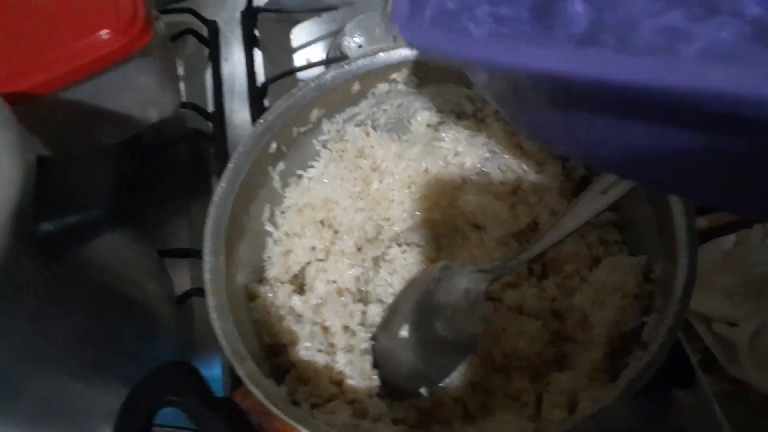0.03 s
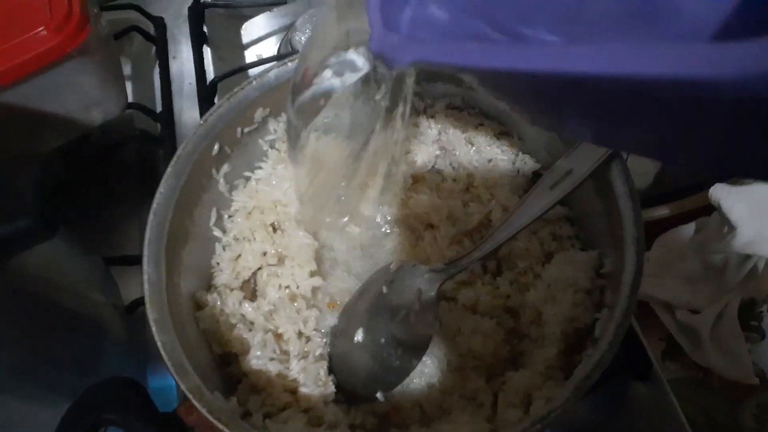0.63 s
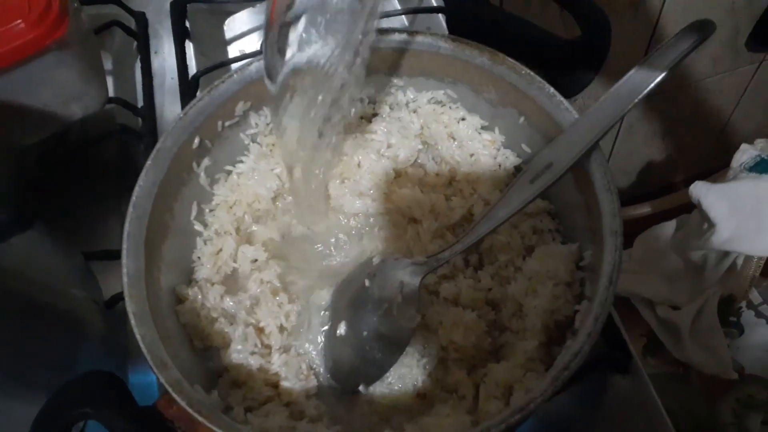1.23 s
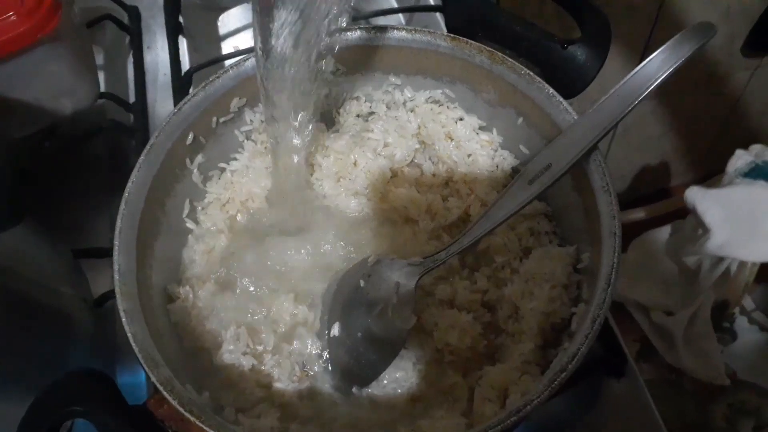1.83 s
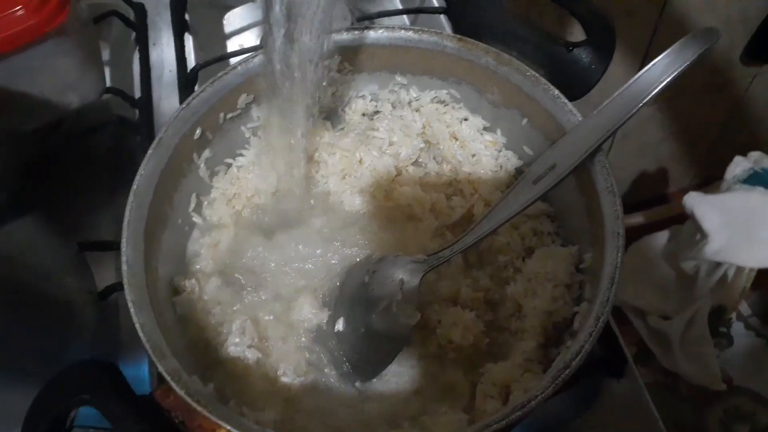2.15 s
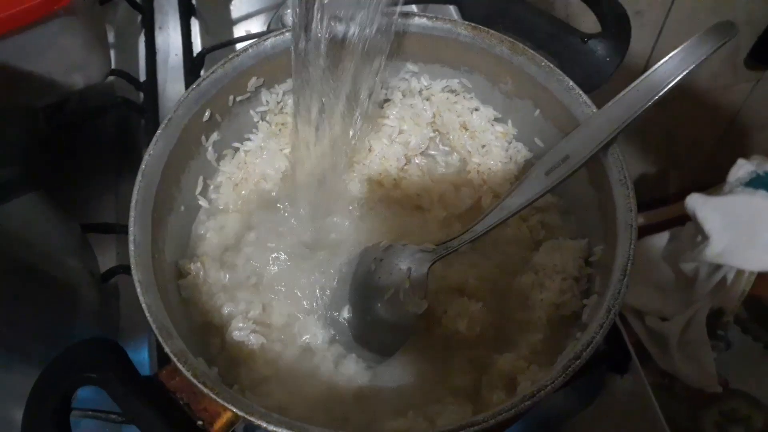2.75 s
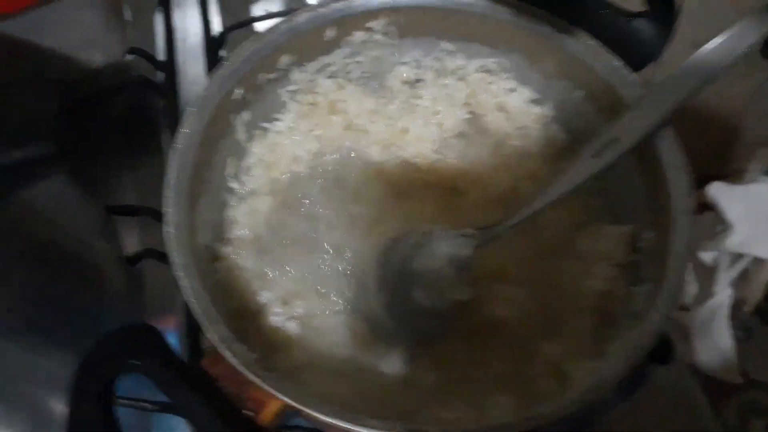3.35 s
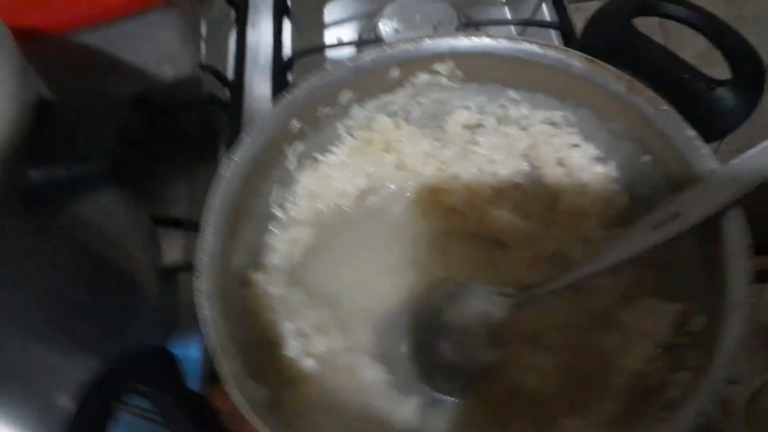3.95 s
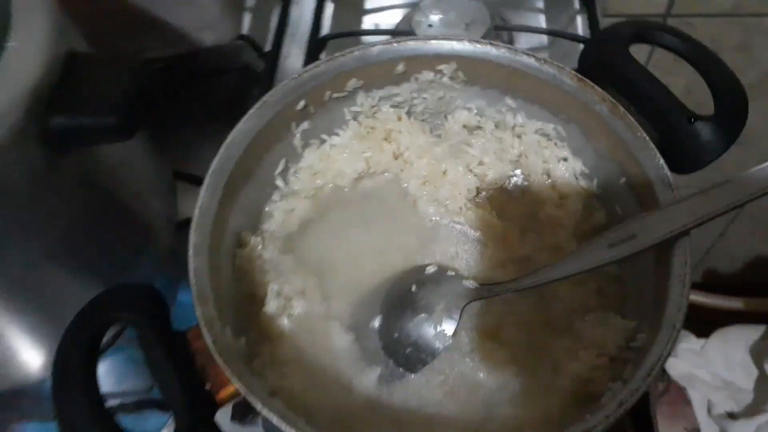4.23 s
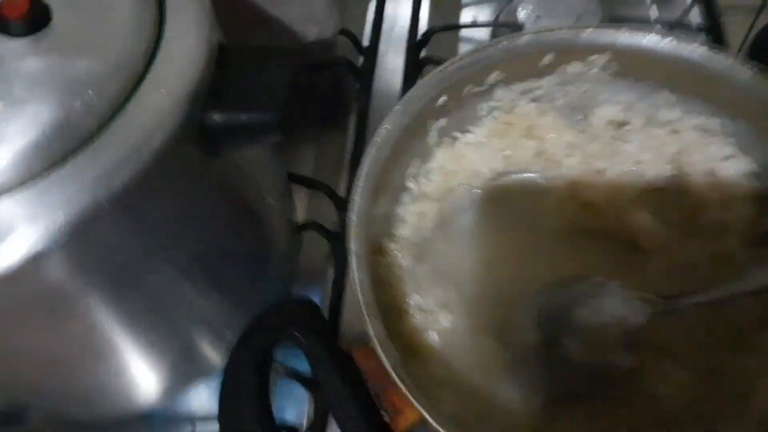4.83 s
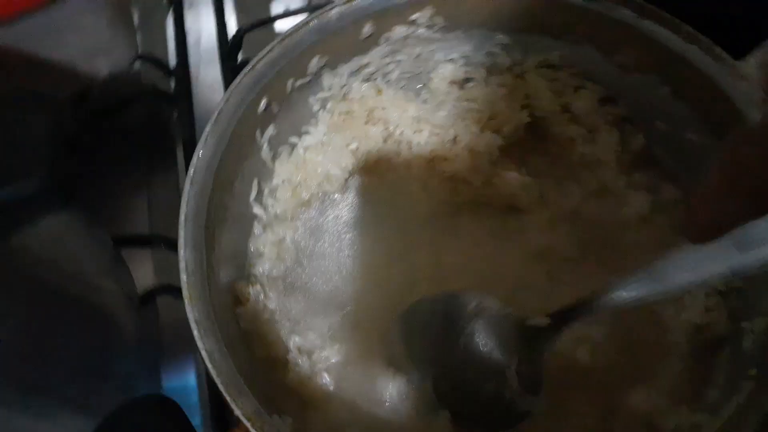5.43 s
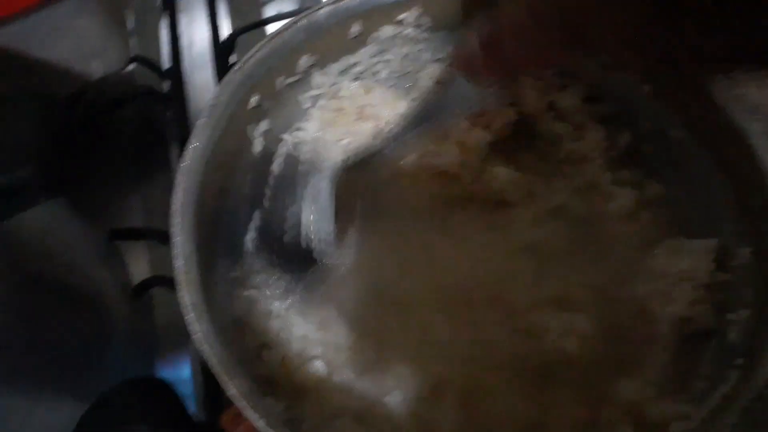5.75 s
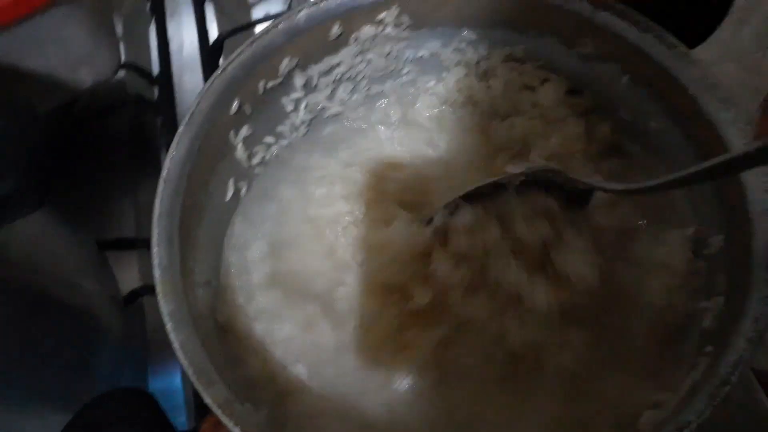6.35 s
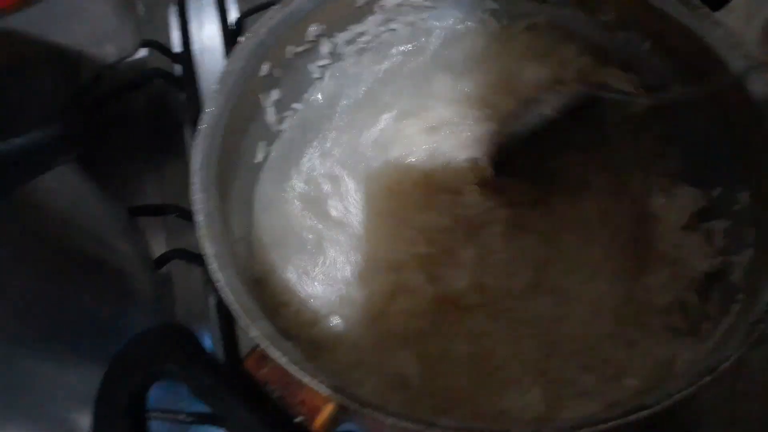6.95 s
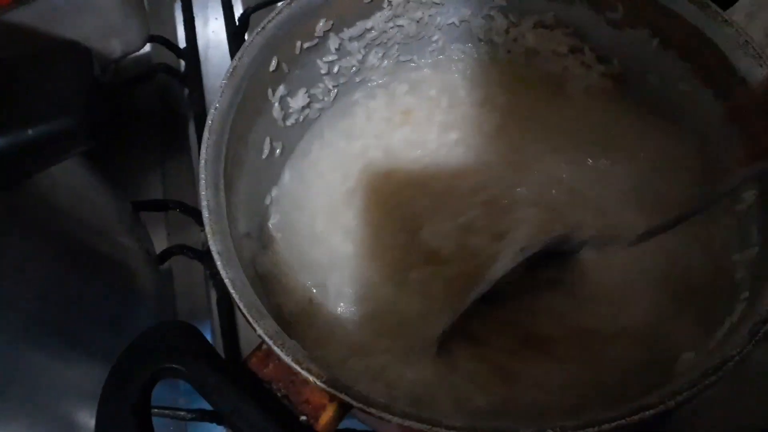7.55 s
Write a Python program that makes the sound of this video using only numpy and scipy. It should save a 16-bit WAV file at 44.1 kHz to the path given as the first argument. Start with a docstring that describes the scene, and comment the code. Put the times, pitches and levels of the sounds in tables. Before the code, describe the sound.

A pressure cooker blows off steam throughout, a bright, breathy hiss that throbs rapidly. Close to the microphone, water is poured onto hot rice for about three seconds, splashing and bubbling as a sizzle flares and fades. A plastic jug is set down with two hollow thumps. Then a metal spoon stirs the wet rice, scraping and knocking the pot, with one sharp clink. The place is a small home kitchen.

```python
"""Pressure cooker and sizzling rice.

A pressure cooker blows off steam on a gas stove, its valve weight throbbing in the jet.
Beside it water is poured from a plastic jug onto hot, sizzling rice. The jug is set down with two
thumps, then a metal spoon stirs the pot. One sharp clink makes a limiter duck."""
import sys
import numpy as np
from scipy import signal
from scipy.fft import rfft, irfft
from scipy.io import wavfile
from scipy.ndimage import uniform_filter1d, minimum_filter1d

SR = 44100
rng = np.random.default_rng(int(sys.argv[2]) if len(sys.argv) > 2 else 0)


def waveform_to_disk(signal):
    """Save audio, clipped to [-1, 1], as 16-bit WAV at the path in sys.argv[1]."""
    frames = np.transpose(np.atleast_2d(signal))
    scaled = np.clip(frames, -1, 1) * 32767
    samples = np.round(scaled).astype(np.int16)
    wavfile.write(sys.argv[1], SR, samples)


N = 339510
TIME = np.arange(N) / SR
FREQS = np.maximum(np.arange(N // 2 + 1) * SR / N, 1)


def from_db(db):
    """Decibels to gain."""
    return 10 ** (np.asarray(db) / 20)


def unit_rms(x):
    """Scale to unit power."""
    return x / np.sqrt(np.mean(x ** 2) + 1e-20)


def curves(rows):
    """Each column after the first (time), interpolated at every sample."""
    times_s, *columns = np.transpose(rows)
    return [np.interp(TIME, times_s, column) for column in columns]


def swell(start_s, length_s, attack_s, release_s):
    """Linear rise, hold, exponential release."""
    rise = np.clip((TIME - start_s) / attack_s, 0, 1)
    return rise * np.exp(-np.clip((TIME - start_s - length_s) / release_s, 0, 20))


def drift(rate_hz):
    """Slow random wander, RMS 1."""
    step, warmup = 40, 2000
    r = np.exp(-2 * np.pi * rate_hz * step / SR)
    noise = rng.standard_normal(N // step + warmup + 2)
    slow = signal.lfilter([1], [1, -2 * r, r * r], noise)[warmup:]
    return np.interp(np.arange(N) / step, np.arange(len(slow)), unit_rms(slow))


def coloured(x, spectrum):
    """Filter by (frequency [Hz], gain [dB]) points."""
    hz, db = np.transpose(spectrum)
    gain = from_db(np.interp(np.log(FREQS), np.log(hz), db))
    return irfft(rfft(x) * gain, N)


def butter(x, order, hz, kind):
    """Butterworth filter."""
    return signal.sosfilt(signal.butter(order, hz, kind, fs=SR, output="sos"), x)


def delayed(x, delay_s):
    """Circular fractional delay."""
    return irfft(rfft(x) * np.exp(-2j * np.pi * FREQS * delay_s), N)


def ring(clicks, hz, t60_s):
    """One mode: a unit click starts a decaying sine of height 1."""
    r = np.exp(-np.log(1000) / (t60_s * SR))
    w = 2 * np.pi * hz / SR
    return signal.lfilter([0, np.sin(w)], [1, -2 * r * np.cos(w), r * r], clicks + 1e-18)


def struck(clicks, modes):
    """All modes of a body, signs alternating."""
    return sum((-1) ** k * from_db(db) * ring(clicks, hz, t60_s)
               for k, (hz, db, t60_s) in enumerate(modes))


def blows(rows):
    """One click per (time [s], level [dB]) row."""
    out = np.zeros(N)
    for at_s, db in rows:
        out[round(at_s * SR)] += from_db(db)
    return out


def grains(per_s, spread_db):
    """Random clicks of uneven size and sign."""
    sizes = from_db(spread_db * np.minimum(rng.exponential(1, N), 5))
    signs = rng.choice([-1, 1], N)
    return sizes * signs * (rng.random(N) < per_s / SR)


def noise_band(hz, width_hz):
    """Two independent channels of resonant noise; the centre may move."""
    r = np.exp(-np.pi * width_hz / SR)
    slow = signal.lfilter([1], [1, -2 * r, r * r], rng.standard_normal((2, 2, N)))
    phase = 2 * np.pi * np.cumsum(hz * np.ones(N)) / SR
    return unit_rms(slow[0] * np.cos(phase) + slow[1] * np.sin(phase))


# burner noise: (frequency [Hz], gain [dB])
FLAME_SPECTRUM = [(25, -34), (45, -11), (60, 3), (78, 3), (100, -12), (143, 7.5), (175, -6), (210, -10),
                  (260, 2.5), (450, 5.5), (900, -3), (3000, -44)]


def flame(level_db=-50.0):
    """The gas burners' low, uneven murmur."""
    level = from_db(level_db + 0.64 * drift(6.8))
    return level * unit_rms(coloured(rng.standard_normal(N), FLAME_SPECTRUM))


# frying: (frequency [Hz], gain [dB])
SIZZLE_SPECTRUM = [(30, -60), (500, -26), (2000, -5.5), (5000, -4), (7400, -5.5), (10000, 2), (12200, 4.5),
                   (14000, 3), (16000, -1)]


def sizzle(fry_db=-22.5, flare_db=-10.5, peak_s=1.22, rise_db_per_s=10, quench_db_per_s=3,
           revived_db=-18.5, revive_at_s=7.1, revive_s=0.16, sputter_db=1.5):
    """Tiny bursts on hot rice flare as water spreads, are quenched, then revive with stirring."""
    since_s = TIME - peak_s
    flare = from_db(flare_db + np.minimum(rise_db_per_s * since_s, -quench_db_per_s * since_s))
    revived = from_db(revived_db) * np.clip((TIME - revive_at_s) / revive_s, 0, 1)
    level = np.sqrt(from_db(fry_db) ** 2 + flare ** 2 + revived ** 2)
    bursts = np.array([grains(per_s=13000, spread_db=2.0) for side in range(2)])
    return level * from_db(sputter_db * drift(19)) * unit_rms(coloured(bursts, SIZZLE_SPECTRUM))


# pockets between rice grains: (frequency [Hz], level [dB], t60 [s])
POCKET_MODES = [(1930, -4, 0.011), (2030, 7, 0.021), (2210, -7, 0.01)]


def slap(level_db=-35):
    """Before a puddle forms, drops burst brightly among the grains."""
    level = from_db(level_db) * swell(start_s=0.26, length_s=0.46, attack_s=.07, release_s=0.15)
    return level * unit_rms(struck(grains(per_s=360, spread_db=3.0), POCKET_MODES))


POUR_START_S = 0.22


def stream():
    """Flow from the jug, 0 to 1."""
    return swell(POUR_START_S, length_s=3.014, attack_s=0.053, release_s=0.074)


# pot under the stream: (frequency [Hz], gain [dB])
DRUMMING_SPECTRUM = [(40, -20), (70, -29), (110, 6.5), (160, -0.5), (240, 2.5), (400, 12), (900, -20)]


def drumming(level_db=-40.5, cushion_db_per_s=3.0):
    """The stream patters dully on rice and pot floor, softer as the water rises."""
    level = from_db(level_db - cushion_db_per_s * (TIME - POUR_START_S))
    drops = grains(per_s=400, spread_db=1.5)
    return level * stream() * unit_rms(coloured(drops, DRUMMING_SPECTRUM))


# pot's colouring of the bubbles: (frequency [Hz], gain [dB])
BUBBLE_SPECTRUM = [(60, -19), (200, -11.5), (270, -2.5), (400, -0.5), (520, 2.5), (660, 2.5), (850, 5),
                   (1300, 1)]


def bubbles(gush_db=-34.5, fade_db_per_s=10.5, puddle_db=-36.5, puddle_at_s=1.22, fill_s=0.69,
            t60_cycles=9.9):
    """The stream beats in small bubbles: a first gush dies down, then a puddle forms."""
    gush = from_db(gush_db - fade_db_per_s * (TIME - POUR_START_S))
    puddle = from_db(puddle_db) * np.clip((TIME - puddle_at_s) / fill_s, 0, 1)
    pitches_hz = np.geomspace(350, 1250, 20)
    births = grains(per_s=500, spread_db=3.0)
    pitch_index = rng.integers(0, len(pitches_hz), N)
    ringing = sum(ring(births * (pitch_index == k), hz, t60_cycles / hz)
                  for k, hz in enumerate(pitches_hz))
    return stream() * np.hypot(gush, puddle) * unit_rms(coloured(ringing, BUBBLE_SPECTRUM))


# big bubbles: (time [s], relative level [dB], start frequency [Hz])
GLUGS = [(.272, -16, 540), (1.696, -11, 711), (1.747, -15, 508), (1.807, -11, 750), (1.987, -15, 398),
         (2.037, -10, 380), (2.201, -12, 460), (2.278, -11, 410), (2.532, -12, 420), (2.599, -10, 553),
         (2.962, -13, 424), (3.148, -12, 553), (3.207, -13, 770)]


def glugs(gain_db=-7.5, chirp_per_s=2.2, attack_s=0.0024, decay_s=0.0071):
    """Big bubbles ring under the stream, rising in pitch."""
    out = np.zeros(N)
    age_s = TIME[:SR // 8]
    envelope = (1 - np.exp(-age_s / attack_s)) * np.exp(-age_s / decay_s)
    for at_s, db, hz in GLUGS:
        start = round(at_s * SR)
        phase = 2 * np.pi * hz * age_s * (1 + chirp_per_s * age_s)
        out[start:start + len(age_s)] += from_db(db + gain_db) * envelope * np.sin(phase)
    return out


# jug contacts, two per thump: (time [s], level [dB], cutoff [Hz], rattle decay [s])
JUG_CONTACTS = [(4.276, -20, 2500, 0.004), (4.308, -23, 600, 0.019), (4.542, -26, 3000, 0.011),
                (4.555, -22, 130, 0.079)]
# jug on worktop: (frequency [Hz], level [dB], t60 [s])
JUG_MODES = [(100, -11, 0.23), (148.5, -6, 0.23), (204, -7.5, 0.27), (287, -15, 0.29), (353, -7, .2),
             (420, 2, 0.067), (479, 0, 0.14), (711, -1, 0.12), (793, 2, 0.086), (852, 2, .08),
             (935, -14, .12), (1258, -2, 0.12), (1750, -10, .04)]


def jug(rattle_gain=0.052, highpass_hz=85):
    """Soft contacts and a rattle of the base ring jug and worktop."""
    force = np.zeros(N)
    for at_s, db, cutoff_hz, rattle_s in JUG_CONTACTS:
        decay = (TIME > at_s) * np.exp(-np.abs(TIME - at_s) / rattle_s)
        rattle = from_db(db) * rattle_gain * decay * rng.standard_normal(N)
        force += butter(blows([(at_s, db)]) + rattle + 1e-18, 1, cutoff_hz, "low")
    return butter(struck(force, JUG_MODES), 2, highpass_hz, "high")


# spoon strokes: (time [s], length [s], rice level [dB], scrape level [dB])
STROKES = [(5.743, 0.29, -41, -37), (6.107, 0.14, -38.5, -46), (6.195, 0.15, -40, -36),
           (6.763, 0.072, -32, -44), (6.917, 0.17, -40, -27.5), (7.175, 0.076, -35, -27.5),
           (7.404, 0.087, -40, -33)]
# shoved wet rice: (frequency [Hz], gain [dB])
RICE_SPECTRUM = [(40, -19), (70, -18), (110, 5.5), (170, -3), (260, -2.5), (400, -8), (900, -22)]
# spoon against pot: (time [s], level [dB])
KNOCKS = [(6.254, -22.5), (6.783, -32), (6.927, -21), (7.041, -26), (7.186, -26), (7.233, -27)]
# pot damped by its filling: (frequency [Hz], level [dB], t60 [s])
POT_MODES = [(237, -19.5, 0.26), (384, -5, 0.04), (464, -7, 0.06), (577, 0, 0.034), (720, -3.5, 0.071),
             (830, -2.5, 0.066), (944, 2, 0.026), (1170, 5, 0.013)]


def stirring(drag_db=-42.5, attack_s=0.006, release_s=0.1):
    """The spoon shoves wet rice, scrapes and knocks the pot, and drags between strokes."""
    first_s = STROKES[0][0]
    end_s = STROKES[-1][0] + STROKES[-1][1]
    shove = press = from_db(drag_db) * swell(first_s, end_s - first_s, attack_s, release_s)
    for at_s, length_s, rice_db, scrape_db in STROKES:
        effort = swell(at_s, length_s, attack_s, release_s)
        shove = np.maximum(shove, from_db(rice_db) * effort)
        press = np.maximum(press, from_db(scrape_db) * effort)
    rice = shove * unit_rms(coloured(grains(per_s=610, spread_db=3.0), RICE_SPECTRUM))
    scrape = press * unit_rms(struck(grains(per_s=310, spread_db=2.5), POT_MODES))
    return rice + scrape + struck(blows(KNOCKS), POT_MODES)


# pot hums: (time [s], length [s], frequency [Hz], level [dB])
HUMS = [(5.764, .14, 248.7, -46), (6.245, 0.071, 255, -41.5), (6.735, 0.29, 472, -38),
        (7.203, 0.042, 262, -32.5)]


def hum(width_hz=62, attack_s=0.024, release_s=0.025):
    """Friction of the dragged spoon briefly sustains one mode of the pot."""
    return sum(from_db(db) * swell(at_s, length_s, attack_s, release_s) * noise_band(hz, width_hz)[0]
               for at_s, length_s, hz, db in HUMS)


# edge contacts of the one clink: (time [s], level [dB])
CLINK_HITS = [(6.639, -4), (6.643, 4)]
# spoon: (frequency [Hz], level [dB], t60 [s])
SPOON_MODES = [(950, -15, .02), (1750, -8, .015), (2067, 0, .02), (2480, -5, .015), (2837, -13, .02)]


def clink(highpass_hz=600, crack_db=-3.0, crack_s=0.0023):
    """The spoon's edge cracks on bare metal; so small a body radiates no bass."""
    hits = blows(CLINK_HITS)
    age_s = TIME[:SR // 50]
    burst = rng.standard_normal(len(age_s)) * np.exp(-age_s / crack_s)
    crack = from_db(crack_db) * signal.fftconvolve(hits, burst)[:N]
    return butter(struck(hits, SPOON_MODES) + crack, 2, highpass_hz, "high")


def skid(start_s=6.68, length_s=.07, attack_s=.04, release_s=.015,
         start_hz=2000, fall_hz_per_s=6000, level_db=-25.5, rough_db=2.0):
    """After the clink the edge skids on: a rough squeak, falling as it slows."""
    hz = start_hz - fall_hz_per_s * np.clip(TIME - start_s, 0, length_s + release_s)
    effort = swell(start_s, length_s, attack_s, release_s)
    return effort * from_db(level_db + rough_db * drift(90)) * noise_band(hz, width_hz=700)[0]


RIGHT_LAG_S = .00041
# left-side shading of the kitchen sounds: (frequency [Hz], gain [dB])
KITCHEN_SHADE = [(60, -24), (250, -22.5), (500, -19.5), (1000, -15), (3000, -19)]


def kitchen(x, t60_s=0.25, room_db=-7.0, gain_db=4.5):
    """Direct sound plus a short tiled-room tail; left shaded, right late."""
    age_s = TIME[:SR // 2]
    decay = np.exp(-np.log(1000) * age_s / t60_s) * (age_s > .004)
    tails = rng.standard_normal((2, len(age_s))) * decay
    wet = [from_db(room_db) * signal.fftconvolve(x, tail / np.linalg.norm(tail))[:N] for tail in tails]
    left = coloured(x + wet[0], KITCHEN_SHADE)
    right = delayed(x, RIGHT_LAG_S) + wet[1]
    return from_db(gain_db) * np.array([left, right])


# reflections of the jet: (time [s], strength [ratio])
BOUNCES = [(0, 0.89), (1.5, 0.1), (3, 0.6), (4.4, 0.66), (7.7, 0.67)]


def among_pots(x, shortest_s=.0006, longest_s=.007, change_hz=4.53, count=24):
    """Short bounces off pots and hands shift as the listener moves, mottling the treble."""
    strength, = curves(BOUNCES)
    delays_s = np.geomspace(shortest_s, longest_s, count) * rng.uniform(.93, 1.07, count)
    treble = butter(x, 1, 2000, "high")
    echoes = sum(drift(change_hz) * np.roll(treble, round(s * SR)) for s in delays_s) / np.sqrt(count)
    return (x + strength * echoes) / np.sqrt(1 + strength ** 2)


# bearing of the hiss: (time [s], relative left gain [dB])
HISS_PAN = [(0, -11), (.7, -8.5), (1.5, -10.5), (2.7, -9), (3.3, -7.5), (4.75, -10), (5.35, -5), (5.8, -7),
            (7.7, -6.5)]
# left-side shading of the hiss: (frequency [Hz], gain [dB])
HISS_SHADE = [(200, -28), (700, -4.5), (1200, 2), (2000, -3), (3000, -0.5), (5300, -1), (6200, 0.5),
              (7000, 6.5), (7700, -14), (8300, -6), (9100, 9), (10500, -0.5), (12500, 0), (16000, 0)]


def place_hiss(pair, left_db=-2.96, correlation=.33):
    """The hiss reaches the left side first, but shaded and mostly scattered."""
    direct, scattered = pair
    pan_db, = curves(HISS_PAN)
    blend = correlation * direct + np.sqrt(1 - correlation ** 2) * scattered
    left = from_db(pan_db + left_db) * coloured(blend, HISS_SHADE)
    return np.array([left, delayed(direct, RIGHT_LAG_S)])


# rocking of the valve weight: (time [s], rate [Hz], relative depth [dB])
ROCKING = [(0, 19.4, 3), (.45, 19.4, 4.2), (.8, 19.4, 1.7), (1.9, 19.3, 1.4), (3.7, 23.4, 1.5),
           (6.3, 18.9, 1.3), (7.3, 22.5, 2.6), (7.7, 22, 1.5)]
# jolts of the weight: (time [s], opening change [dB])
JOLTS = [(.04, -4.5), (1.41, -5), (2.84, 0.5), (4.51, -4.5), (5.40, 2.5), (5.55, -3), (5.71, -3.5),
         (6.17, -3.5), (6.86, -2.5), (7.40, -4.5)]


def valve_opening(flutter_db=0.1, wander_db=1.29, jolt_s=0.016):
    """The weight rocks on its nozzle, shivers, and now and then jolts."""
    rate_hz, depth_db = curves(ROCKING)
    rock = -np.cos(2 * np.pi * np.cumsum(rate_hz) / SR)
    rock_db = depth_db * rock * (0.52 + 0.13 * drift(12))
    shiver_db = flutter_db * drift(48) + wander_db * drift(12)
    jolt_db = sum(db * np.exp(-((TIME - at_s) / jolt_s) ** 2) for at_s, db in JOLTS)
    return from_db(rock_db + shiver_db + jolt_db)


# steam jet: (frequency [Hz], gain [dB])
RUSH_SPECTRUM = [(30, -50), (100, -22), (300, -16), (600, -11.5), (1000, -4.5), (1500, -2), (2050, -1),
                 (2600, -2), (4000, 0), (5800, -1.5), (7400, -7.5), (9000, -10), (16000, -51.5)]
# low, middle, upper and top valve resonances: (frequency [Hz], width [Hz], throb [exponent])
WHISTLES = [(4650, 860, 0.92), (5280, 620, 1.67), (8730, 1100, 1.16), (10765, 2260, 1.16)]
# middle whistle: (time [s], level [dB])
MIDDLE_LEVELS = [(0, -18), (.45, -23), (.9, -25.5), (1.9, -28.5), (2.2, -24.5), (2.8, -26.5), (3.05, -19.5),
                 (3.6, -22), (4.5, -26), (5.35, -23), (6.0, -25.5), (6.7, -31.5), (7.7, -24)]
# treble whistles: (time [s], upper level [dB], top level [dB])
TREBLE_LEVELS = [(0, -13.5, -13), (.2, -13.5, -13.5), (.6, -18, -17.5), (1.4, -16, -19.5),
                 (1.9, -18, -18.5), (2.7, -16.5, -20.5), (3.1, -15.5, -18), (4.1, -17, -16),
                 (4.8, -16, -14.5), (5.15, -18.5, -16), (5.4, -13, -17), (6.1, -13, -15.5), (6.8, -16, -16),
                 (7.7, -16, -15.5)]


def steam(rush_db=-18, low_start_db=-35, growth_db_per_s=1.01, jump_db=8, flutter_db=1.03, waver=.009):
    """Steady pressure drives a broad rush and breathy whistles, all throbbing with the valve."""
    jump = swell(start_s=6.22, length_s=0.31, attack_s=0.079, release_s=0.17)
    low_db = low_start_db + growth_db_per_s * TIME + jump_db * jump
    levels_db = [low_db] + curves(MIDDLE_LEVELS) + curves(TREBLE_LEVELS)
    opening = valve_opening()
    out = opening * from_db(rush_db) * unit_rms(coloured(rng.standard_normal((2, N)), RUSH_SPECTRUM))
    for level_db, (hz, width_hz, throb) in zip(levels_db, WHISTLES):
        strength = opening ** throb * from_db(level_db + flutter_db * drift(15))
        out += strength * noise_band(hz * (1 + waver * drift(5)), width_hz)
    return out


def scene():
    """The hiss throbs over the work at the pot."""
    jet = np.array([among_pots(side) for side in steam()])
    water = slap() + bubbles() + glugs() + drumming()
    hiss = place_hiss(jet + sizzle())
    thumps = jug()
    spoon = stirring() + hum() + clink() + skid()
    return hiss + kitchen(water + thumps + spoon + flame())


def record(dry, ceiling_db=0.0, release_db_per_s=230, smooth_samples=45, cutoff_hz=15800):
    """A fast limiter ducks both channels on peaks; a steep low-pass follows."""
    peak_db = 20 * np.log10(np.abs(dry).max(axis=0) + 1e-9)
    over_db = np.maximum(peak_db - ceiling_db, 0)
    recovery_db = release_db_per_s * TIME
    duck_db = np.maximum.accumulate(over_db + recovery_db) - recovery_db
    gain = uniform_filter1d(minimum_filter1d(from_db(-duck_db), smooth_samples), smooth_samples)
    lowpass = signal.ellip(12, .1, 70, cutoff_hz, fs=SR, output="sos")
    return np.clip(signal.sosfilt(lowpass, gain * dry), -1, 1)


dry = scene()
out = record(dry)
waveform_to_disk(out)
```